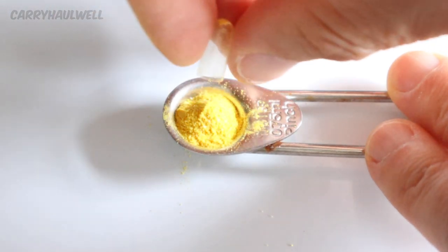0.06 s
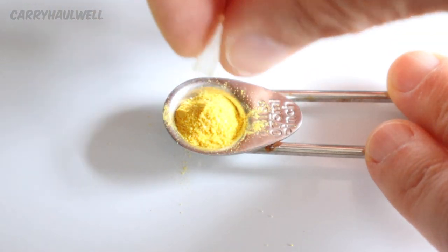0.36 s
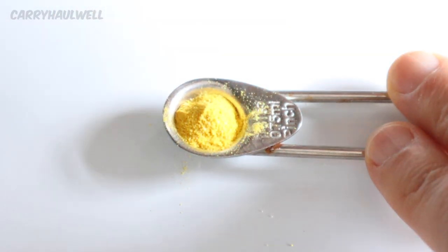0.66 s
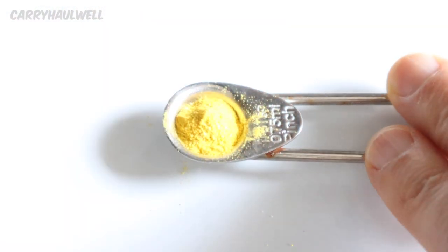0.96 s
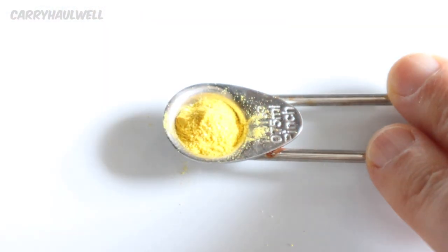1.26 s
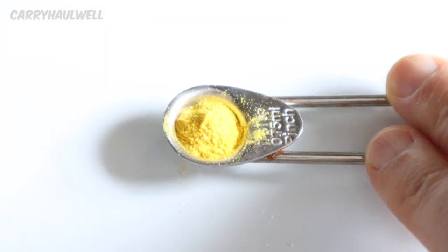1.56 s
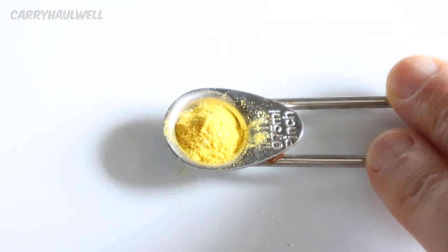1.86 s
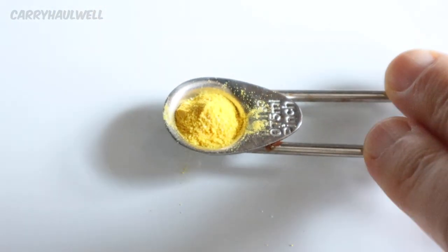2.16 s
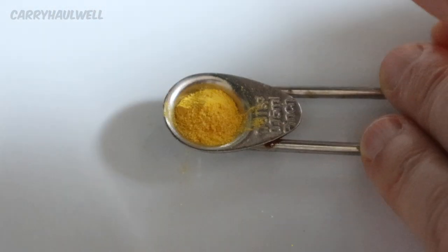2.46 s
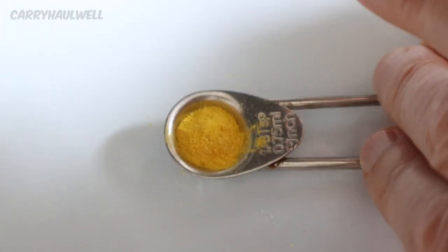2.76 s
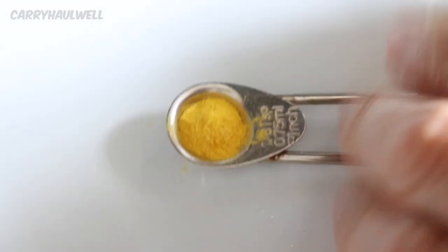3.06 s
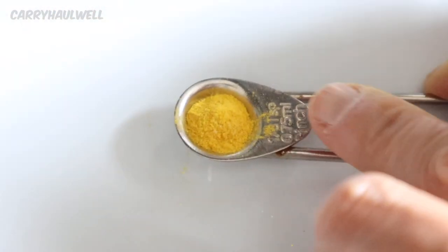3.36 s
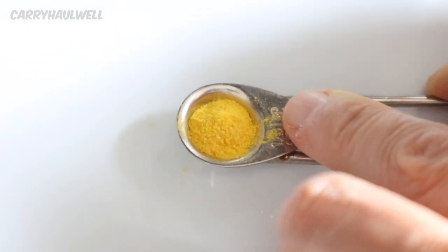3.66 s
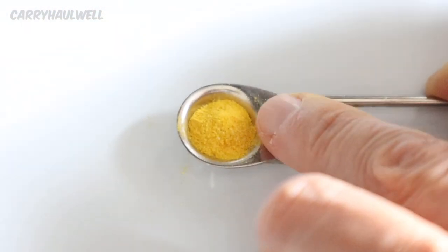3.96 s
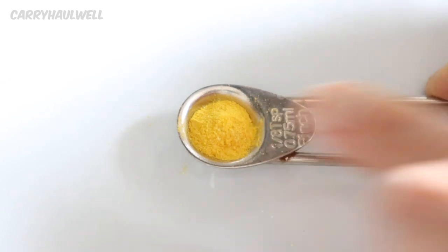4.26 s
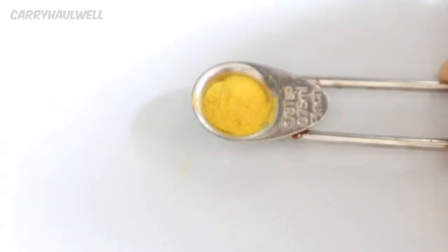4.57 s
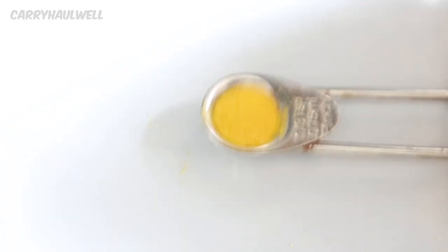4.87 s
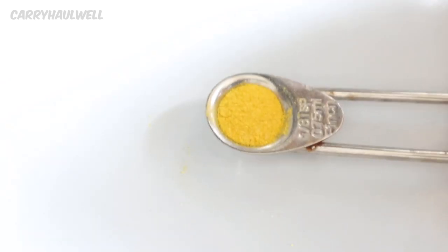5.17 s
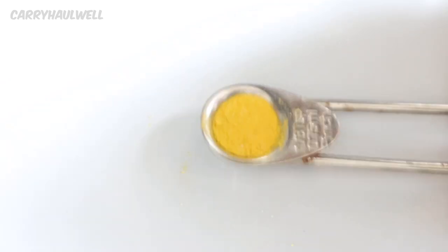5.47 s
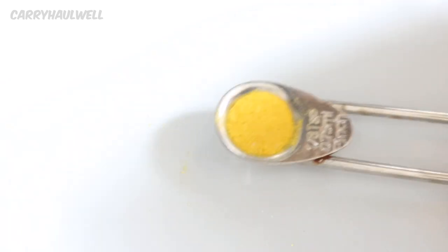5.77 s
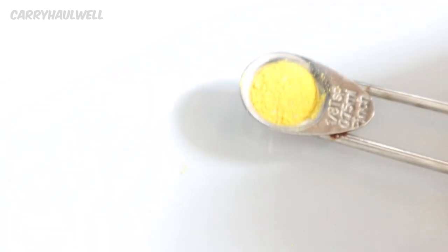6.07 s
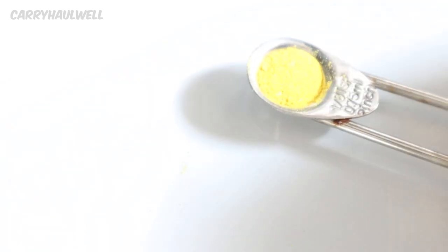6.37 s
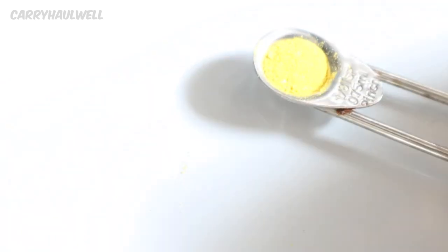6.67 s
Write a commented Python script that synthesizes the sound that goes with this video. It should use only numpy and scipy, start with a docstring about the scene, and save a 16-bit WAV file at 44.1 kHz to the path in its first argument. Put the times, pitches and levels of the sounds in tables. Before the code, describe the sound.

In a quiet room with a low hum, an empty capsule shell clicks and crinkles faintly. A small steel measuring spoon taps on a dish, with dull thuds of pressing fingers and two brief clinks of its wire handle. After a lull, the spoon knocks rapidly and scrapes over the dish in tiny jolts, ending with a few separate taps. Everything is close and slightly to the right.

```python
"""In a quiet room that hums low, a small steel measuring spoon of powder is held on a dish close by.
An emptied capsule shell clicks and crinkles as it is put aside. Fingers press the powder down with
dull thuds, and the wire handle clinks when they let it drop. The spoon knocks on the dish, making
both ring briefly, and scrapes over it in tiny jolts as it sticks and slips."""
import sys
import numpy as np
from scipy import signal
from scipy.fft import rfft, irfft, next_fast_len
from scipy.io import wavfile

SR = 44100
rng = np.random.default_rng(int(sys.argv[2]) if len(sys.argv) > 2 else 0)


def dump(signal):
    """Clip the signal to [-1, 1] and save it as 16-bit WAV at the path in sys.argv[1]."""
    limited = np.clip(np.atleast_2d(signal).T, -1, 1)
    pcm = np.round(limited * 32767).astype(np.int16)
    wavfile.write(sys.argv[1], SR, pcm)


N = 300235
T = np.arange(N) / SR
AGE = T[:int(0.4 * SR)]  # seconds since the start of one hit
ATTACK = int(0.02 * SR)  # a hit's level is set over this many opening samples

# the room's rumble and hiss: f/Hz, level/dB
AIR_SPECTRUM = [(12, -30), (20, -13.5), (53, 7), (111, -3), (132, -9), (178, -0.5), (270, -9.5), (377, -6),
                (457, -14), (571, -14), (865, -18.5), (1420, -23), (6910, -41), (12400, -55), (15000, -79)]
# the tones of its hum: f/Hz, level/dB
HUM_TONES = [(54, -79), (107, -54), (135, -58), (172, -63)]
# capsule clicks: t/s, body level/dB, snap level/dB, fizz level/dB, crumple time/s
CAPSULE_CLICKS = [(0.7046, -60, -63, -98, 0.00059), (0.996, -54, -79, -93, .003),
                  (1.645, -54, -78, -98, 0.0023), (1.654, -36, -48, -79, 0.0051),
                  (1.674, -57, -72, -88, 0.0027), (1.7235, -46, -48, -65, 0.0046),
                  (1.7575, -44, -53, -61.5, 0.0042), (1.829, -47.5, -56.5, -67.5, 0.0056),
                  (2.812, -47, -71, -69, 0.0011), (3.1299, -42, -60, -67, 0.0058)]
# the noise of the cracking shell: f/Hz, level/dB
SHELL_SPECTRUM = [(500, 14), (1200, 4), (3000, 4.5), (4200, 15), (5700, 12), (6400, 13), (7600, -3),
                  (15000, -5)]
# the shell's modes (notes it rings at): f/Hz, level/dB, t60/s (time to fade by 60 dB)
SHELL_NOTES = [(1890, -10, 0.012), (2960, 5.5, 0.019), (5760, 1, 0.018), (6170, -1, 0.013)]
# spoon slides, pressed harder, then eased off: t/s, rise/s, fall/s, rub level/dB, grit level/dB
SPOON_SLIDES = [(0.97, 0.021, 0.85, -61, -68), (2.692, 0.0087, 0.091, -46.5, -51.5),
                (2.75, 0.12, 0.13, -38.5, -51.5), (4.64, 0.075, 0.07, -34.5, -44),
                (4.83, 0.089, 0.15, -31, -41.5), (5.27, 0.038, 0.17, -37, -49.5),
                (5.29, 0.1, 0.039, -42, -45), (5.43, 0.012, 0.47, -33.5, -51),
                (5.46, 0.068, 0.043, -50, -39), (5.65, 0.011, 0.036, -33.5, -38.5),
                (5.7, 0.045, 0.14, -40, -49), (5.999, 0.049, 0.044, -41.5, -59),
                (6.1, 0.026, 0.18, -55.5, -62)]
# clear modes of the dish on the table: f/Hz, level/dB, t60/s
DISH_NOTES = [(135.2, -12, 0.56), (161.6, -9.5, 0.42), (297, -3.5, 0.19), (380, -0.5, 0.087),
              (471, 3, 0.062), (572, -3.5, 0.046), (706.5, -9, 0.23), (903, 6, 0.059), (1216, -2.5, 0.082),
              (1581, 1.5, 0.084), (2044, 3, 0.03), (2750, 0, 0.048), (3190, -7.5, 0.059), (3660, -5, 0.028)]
# its many short-lived modes, blurred into noise: f/Hz, level/dB
CLATTER_SPECTRUM = [(70, 6.5), (170, -3.5), (235, -5.5), (350, 3.5), (520, 5.5), (660, -7.5), (950, -2.5),
                    (1380, -9.5), (1580, -4), (1900, -9.5), (2400, -11.5), (3200, -14), (4400, -30.5),
                    (6500, -59), (12000, -51)]
# the hard tick of steel on the dish: f/Hz, level/dB
TICK_SPECTRUM = [(3000, -10), (4200, -1), (4900, -5.5), (6700, -6), (7900, -11), (8450, -5.5), (9300, -18),
                 (10300, -10), (11000, -15.5), (12200, -18), (13700, -26), (14300, -38)]
# modes of the steel spoon: f/Hz, level/dB, t60/s
SPOON_NOTES = [(3900, -2, .12), (4430, 0, .15), (5260, -4, .14), (5700, -5, .12), (6450, 0, .12),
               (6880, -2, .11), (7530, -4, .13), (8480, 0, .17), (10300, -5, .15), (10600, -6, .15),
               (11580, -5, .1), (12200, -3, .06), (13700, -5, .06)]
# spoon knocks: t/s, level/dB, hardness/(dB per octave), hollow rap/dB, looseness of grip (1 = free),
# body f/Hz and clack f/Hz of the struck spot
SPOON_KNOCKS = [(1.072, -44.5, -6, -9, 0.4, 470, 2330), (1.4901, -37.5, -4, 8.5, 0.58, 900, 2160),
                (1.621, -42, -6, -12, 0.59, 480, 2800), (1.872, -43, -3, 1.5, 1.1, 470, 2460),
                (2.2012, -39.5, -1, 1, 0.65, 454, 2090), (2.254, -40.5, -6, 5, 1.3, 440, 2140),
                (2.2995, -36, -5.5, 4, 0.76, 378, 1500), (2.502, -39.5, -5.5, 2.5, 0.66, 417, 2850),
                (2.766, -42.5, -1.5, -10, 0.66, 570, 2720), (2.7936, -35, -3.5, 5.5, 0.77, 576, 2750),
                (2.814, -41.5, -0.4, 3.5, 0.63, 553, 2810), (2.85, -48, -4, 9, 0.48, 380, 1640),
                (2.881, -31, -1.5, 3, 0.75, 494, 2930), (2.958, -53, -5, 8, 0.26, 490, 3120),
                (3.124, -35.5, -5.5, -2, 0.26, 470, 1790), (3.1317, -27, -1.5, -3.5, 0.55, 457, 1790),
                (3.144, -39, 1.5, 9, 0.48, 490, 1890), (3.186, -41.5, -1.5, 2.5, 1, 455, 2110),
                (3.259, -43.5, -7.5, 8.5, 0.53, 504, 1480), (3.2765, -34.5, -8, 5, 0.46, 480, 1500),
                (3.922, -47, -6.5, -13, 1.3, 362, 1940), (4.394, -39.5, -2.5, 1.5, 0.65, 463, 2720),
                (4.5353, -43.5, 0, 4, 0.34, 820, 2850), (4.551, -45, -1.5, 2, 0.91, 513, 1570),
                (4.6104, -37.5, 3.5, 4, 1.06, 472, 2030), (4.649, -28.5, 0.3, 5, 0.51, 530, 2450),
                (4.659, -34.5, 2.46, -2, 0.25, 530, 2450), (4.68, -43, 1, 4, 0.44, 590, 2700),
                (4.705, -41.5, -1, 6, 1.3, 296, 2660), (4.78, -39, 1, 3, 1.5, 1127, 2010),
                (4.801, -31, 0.1, 1, 0.88, 516, 2970), (4.8184, -28, 2, -22, 0.91, 510, 1570),
                (4.829, -28.5, 1.5, -1, 0.64, 483, 1530), (4.853, -31.5, -1.5, 1, 0.85, 400, 2120),
                (4.885, -41, 0, -10, 0.29, 483, 1490), (4.897, -33, -5, 4, 0.32, 530, 2380),
                (4.906, -38.5, -1, 11.5, 0.54, 550, 2400), (4.93, -41.5, 3, -2, 0.7, 477, 2380),
                (4.952, -34.5, -1.5, -3, 0.72, 452, 1600), (4.9827, -34, 1.2, 4, 0.93, 380, 2750),
                (5.0124, -30, -3, 1, 0.34, 566, 2650), (5.039, -38, -1.5, -2, 0.37, 534, 1530),
                (5.1023, -32, -2, -1.5, 0.57, 436, 2790), (5.146, -36, -5, 1.5, 0.25, 610, 2840),
                (5.198, -41.5, -6.5, -5, 0.17, 590, 2690), (5.243, -44.5, -2.5, -3, 0.81, 380, 1820),
                (5.308, -42, -2, -4, 1.8, 410, 3190), (5.346, -39, -2, 8, 0.14, 390, 3130),
                (5.374, -41.5, 1, 7, 1.2, 470, 2420), (5.412, -42.5, 1, -1, 0.53, 600, 1520),
                (5.4483, -38, 4, 1, 0.97, 495, 3180), (5.463, -35, -6.5, 5, 0.79, 495, 3240),
                (5.501, -38.5, 1, 0, 0.9, 556, 3180), (5.535, -36.5, 0, 4.5, 0.7, 580, 1516),
                (5.549, -36, -3, -10, 0.27, 298, 1590), (5.6002, -35.5, 3.5, 4, 0.76, 900, 3220),
                (5.641, -44.5, 1.5, 3, 0.22, 860, 1540), (5.672, -43.5, 2.1, -7, 0.31, 920, 2020),
                (5.708, -41, -6.5, 3, 0.23, 490, 2150), (5.749, -39.5, 4, 0.5, 0.75, 526, 3270),
                (6.14, -47.5, -6.5, 3, 0.58, 366, 1500), (6.176, -45.5, -2.5, 0, 0.43, 580, 1840),
                (6.3736, -30.5, -0.6, 7.5, 0.45, 830, 1470), (6.448, -44.5, -1.5, 6, 0.35, 590, 1590),
                (6.549, -45, -1.5, -10, 0.61, 464, 2080), (6.727, -49, -4, 9, 0.77, 820, 1950)]
# a knock's five pitch ranges (thump, body, rap, clack, tick): f/Hz, level/dB at hardness 0
KNOCK_RANGES = [(130, -9.5), (420, 3), (900, -1), (2200, -2.5), (7000, -22.5)]
# the hand's weight comes down on the dish: t/s, level/dB
HAND_THUDS = [(2.2, -51), (2.253, -48), (2.414, -40.5), (2.502, -37.5), (3.187, -56), (3.258, -36.5),
              (3.2741, -35.5), (4.5354, -39.5), (4.6056, -37.5), (4.649, -31), (4.848, -31), (5.011, -35),
              (5.146, -37)]
# the wire handle drops: t/s, level/dB, f/Hz, top ring level/dB
HANDLE_CLINKS = [(2.8825, -51, 2840, -64), (3.133, -51, 4414, -65)]
# the handle's thin top ring: f/Hz, level/dB, t60/s
HANDLE_NOTES = [(8400, -3, .07), (11590, -5, .04), (12050, 0, .05), (13750, 1, .06)]
# stereo width of close sounds: f/Hz, side minus mid level/dB
NEAR_WIDTH = [(60, -27), (300, -44), (700, -13.5), (1400, -7.5), (3000, -2.5), (6000, 5.5), (13000, 10.5)]
# stereo width of sound from all around: f/Hz, side minus mid level/dB
DIFFUSE_WIDTH = [(60, -27), (110, -21.5), (200, -10), (380, -10), (700, -3), (1300, 1), (2400, 3.5),
                 (8000, 5), (15000, 3)]
# balance of close sounds: f/Hz, left minus right level/dB
BALANCE = [(110, 0.5), (700, -1), (1300, -3.5), (2400, -5), (4400, -3), (15000, -2)]
# how long the room echoes: f/Hz, t60/s
ROOM_DECAY = [(100, 0.45), (500, 0.37), (1200, 0.51), (2500, 0.51), (6000, 0.47), (14000, 0.18)]
# share of the spoon and dish that the room gives back: f/Hz, level/dB
ROOM_SHARE = [(400, -6.5), (1200, -14.5), (3200, -15), (7000, -22)]


def undb(db):
    """Turn decibels into a number to multiply by."""
    return 10 ** (np.asarray(db) / 20)


def rms(x):
    """Average strength of a signal (root mean square)."""
    return np.sqrt(np.mean(x ** 2) + 1e-20)


def unit(x):
    """Scale a signal so that its energy is 1."""
    return x / np.sqrt(np.sum(x ** 2))


def fade(t60):
    """A curve, one hit long, that falls by 60 dB every t60 seconds."""
    return np.exp(-np.log(1000) * AGE / max(t60, 1e-4))


def lookup(points, hz):
    """Read between (f, value) points, with the octaves evenly spaced."""
    f, value = np.transpose(points)
    return np.interp(np.log(np.maximum(hz, 1)), np.log(f), value)


def colour(x, points, turn=1):
    """Turn each pitch up or down by (f, level) points; turn=-1j delays it a quarter cycle."""
    size = next_fast_len(x.shape[-1])
    gains = undb(lookup(points, np.fft.rfftfreq(size, 1 / SR)))
    return irfft(rfft(x, size) * turn * gains, size)[..., :x.shape[-1]]


def band(x, lo_hz, hi_hz, order=3):
    """Keep the pitches between two limits."""
    return signal.sosfilt(signal.butter(order, [lo_hz, hi_hz], "band", fs=SR, output="sos"), x)


def through(x, response):
    """Let every push in x set off the response, an object's sound after one tap."""
    return signal.oaconvolve(x, response)[:len(x)]


def add(track, s, sound):
    """Mix a sound into a track at s seconds."""
    start = int(s * SR)
    track[start:start + len(sound)] += sound[:N - start]


def at_level(hit, db):
    """Scale a hit so that its opening has this level."""
    return hit * undb(db) / rms(hit[:ATTACK])


def band_levels(hit, edges_hz, levels_db, order=3):
    """Give each pitch range of a hit its own level, as a soft or hard touch does."""
    parts = (band(hit, lo, hi, order) for lo, hi in zip(edges_hz, edges_hz[1:]))
    return sum(at_level(part, db) for part, db in zip(parts, levels_db))


def noise(spectrum):
    """Coloured noise, one hit long."""
    return colour(rng.standard_normal(len(AGE)), spectrum)


def mode(hz, t60):
    """One pure note that dies away."""
    return unit(fade(t60) * np.sin(2 * np.pi * hz * AGE))


def ring(modes, scatter_db, detune, looseness=1):
    """Several fading notes, a little different at each touch; a loose grip lets them last."""
    gains = undb(scatter_db * rng.uniform(-1, 1, len(modes))) * rng.choice([-1, 1], len(modes))
    shifts = 1 + detune * rng.uniform(-1, 1, len(modes))
    return unit(sum(gain * undb(db) * fade(t60 * looseness) * np.sin(2 * np.pi * hz * shift * AGE)
                    for gain, shift, (hz, db, t60) in zip(gains, shifts, modes)))


def contact(chatter_s, chatter_db=-7, bounces_per_s=1500):
    """One push, then tiny bounces that quickly die out."""
    bounces = rng.standard_normal(len(AGE)) * (rng.random(len(AGE)) < bounces_per_s / SR)
    return (AGE == 0) + undb(chatter_db) * bounces * np.exp(-AGE / max(chatter_s, 1e-4))


def jolts(per_s, size, spread_db=5):
    """Little pushes of uneven strength at random moments."""
    strengths = undb(spread_db * np.clip(rng.standard_normal(size), -2, 2)) * rng.choice([-1, 1], size)
    pushes = (rng.random(size) < per_s / SR) * strengths
    return pushes / rms(pushes)


def room_hum(air_db=-46, waver_hz=5, waver_db=2.5):
    """A steady rumble and hiss lie under low tones that waver in level and pitch."""
    mid, side = colour(rng.standard_normal((2, N)), AIR_SPECTRUM)
    out = diffuse(mid, side) * undb(air_db) / rms(mid)
    times = np.arange(0, T[-1] + 1, 1 / waver_hz)
    for hz, db in HUM_TONES:
        swell, drift = (np.interp(T, times, rng.standard_normal(len(times))) for _ in range(2))
        out += np.sqrt(2) * undb(db + waver_db * swell) * np.sin(2 * np.pi * hz * T + 2 * drift)
    return out


def capsule_clicks(crack_t60=0.019, notes_db=-5, crinkle_db=-5.5, crinkle_t60=0.27, full_crumple_s=0.004):
    """The thin shell snaps, then gives way in tiny dry steps; a longer crumple crinkles louder."""
    out = np.zeros(N)
    for s, body_db, snap_db, fizz_db, crumple_s in CAPSULE_CLICKS:
        crack = unit(noise(SHELL_SPECTRUM) * fade(crack_t60))
        crease = unit(noise(SHELL_SPECTRUM) * fade(crack_t60 / 2))
        notes = ring(SHELL_NOTES, scatter_db=3, detune=0.03)  # squeezing shifts them
        force = unit(contact(crumple_s, chatter_db=-2.5, bounces_per_s=2000))
        snap = through(force, crack + undb(notes_db) * notes)
        steps = unit(jolts(per_s=800, size=len(AGE)) * fade(crinkle_t60))
        crinkle = undb(crinkle_db) * crumple_s / full_crumple_s * through(steps, crease)
        click = band_levels(snap + crinkle, [300, 2200, 7500, 15000], [body_db, snap_db, fizz_db], 4)
        add(out, s, click)
    return out


def dish(looseness, clatter_t60=0.15, notes_db=-3):
    """One touch on the dish sets off a few clear notes within a short clatter."""
    clatter = unit(noise(CLATTER_SPECTRUM) * fade(clatter_t60 * looseness))
    notes = ring(DISH_NOTES, scatter_db=4, detune=0.04, looseness=min(looseness, 1.2))
    return clatter + undb(notes_db) * notes


def steel(looseness, hardness, tick_t60=0.052, ring_db=-13.5):
    """The spoon gives a short tick, duller for a soft touch, and rings faintly."""
    treble_db = 1.5 * (hardness - 3)
    hiss = colour(noise(TICK_SPECTRUM), [(6500, 0), (13000, treble_db)])
    tick = unit(hiss * fade(tick_t60 * looseness))
    return tick + undb(ring_db) * ring(SPOON_NOTES, scatter_db=6, detune=0.025)


def spoon_scrapes(slips_per_s=220, grains_per_s=800, looseness=0.42, steel_db=-21, spots=3):
    """The spoon sticks and slips, rubbing the dish; finer grains add grit and a steely rasp."""
    out, age = np.zeros(N), T[:int(1.2 * SR)]
    for s, rise_s, fall_s, rub_db, grit_db in SPOON_SLIDES:
        pressure = np.interp(age, [0, rise_s, rise_s + fall_s], [0, 1, 0])
        place = (spots - 1) * age / (rise_s + fall_s)
        rasp = undb(steel_db) * unit(band(steel(looseness, hardness=0), 3800, 6500))
        for spot in range(spots):  # each spot along the slide rings differently
            push = pressure * np.sqrt(np.maximum(1 - abs(place - spot), 0))
            response = dish(looseness)
            rub = unit(band(response, 140, 1000))
            grit = unit(band(response, 1000, 4400)) + rasp
            for per_s, db, body in (slips_per_s, rub_db, rub), (grains_per_s, grit_db, grit):
                add(out, s, undb(db) * through(push * jolts(per_s, len(age)), body))
    return out


def struck_spot(body_hz, clack_hz, looseness, body_db=-5, clack_db=-10.5):
    """The spot that is hit favours two notes: a low body and a brief, higher clack."""
    body = undb(body_db) * mode(body_hz, t60=0.048 * looseness)
    return body + undb(clack_db) * mode(clack_hz, t60=0.022)


def spoon_knocks(chatter_s=0.0031, rise_s=0.0006):
    """The spoon hits the dish: harder is brighter, and a loose spoon chatters and rings longer."""
    out, rise = np.zeros(N), 1 - np.exp(-AGE / rise_s)
    centres_hz, plain_db = np.transpose(KNOCK_RANGES)
    octaves_above_body = np.maximum(np.log2(centres_hz / 420), 0)
    for s, db, hardness, hollow_db, looseness, body_hz, clack_hz in SPOON_KNOCKS:
        thump_db, body_db, rap_db, clack_db, tick_db = db + plain_db + hardness * octaves_above_body
        force = contact(chatter_s * looseness ** 2)
        response = dish(looseness) + struck_spot(body_hz, clack_hz, looseness)
        blow = through(force, response * rise)
        tick = through(force, steel(looseness, hardness) * rise)
        levels_db = [thump_db, body_db, rap_db + hollow_db, clack_db]
        add(out, s, band_levels(blow, [85, 290, 710, 1150, 4200], levels_db) + at_level(tick, tick_db))
    return out


def hand_thuds(push_s=0.0084, table_db=-9):
    """A soft hand stirs only the lowest notes of the dish and the table under it."""
    out = np.zeros(N)
    for s, db in HAND_THUDS:
        response = dish(looseness=0.85) + undb(table_db) * mode(hz=145, t60=0.054)
        thud = band(through(contact(push_s), response), 95, 210)
        add(out, s, at_level(thud, db))
    return out


def handle_clinks():
    """The dropped wire handle rings briefly: one clear note with thin, high ones above it."""
    out = np.zeros(N)
    for s, db, hz, top_db in HANDLE_CLINKS:
        top = ring(HANDLE_NOTES, scatter_db=2, detune=0.004)
        add(out, s, at_level(mode(hz, t60=0.065), db) + at_level(top, top_db))
    return out


def near(x):
    """A close sound a little to the right: the left channel is later and mostly weaker."""
    side = colour(x, NEAR_WIDTH, turn=-1j)
    return np.array([colour(x + sign * side, [(hz, sign * db / 2) for hz, db in BALANCE])
                     for sign in (1, -1)])


def diffuse(mid, side):
    """Sound from all around, wider at high pitches: both ears share mid, and side sets them apart."""
    side = colour(side, DIFFUSE_WIDTH)
    return np.array([mid + side, mid - side])


def table_echoes(x, t60=0.0077, build_s=0.00086, change_s=0.13, patterns=4):
    """Table and hands throw back a quick spray of echoes that changes as the hands move."""
    shape = fade(t60) * (1 - np.exp(-AGE / build_s))
    place, mid_side = T / change_s, np.zeros((2, N))
    for k in range(patterns):  # each echo pattern blends into the next, round and round
        share = np.sqrt(np.maximum(1 - abs((place - k + 1) % patterns - 1), 0))
        sprays = rng.standard_normal((2, len(AGE))) * shape
        mid_side += [through(x * share, unit(spray)) for spray in sprays]
    return diffuse(*mid_side)


def room_echoes(x, build_s=0.00082):
    """The echoes of a small room build up fast and die soonest in the high treble."""
    edges_hz = np.geomspace(60, 16000, 9)
    hiss = rng.standard_normal((2, len(AGE)))
    tails = sum(band(hiss, lo, hi) * fade(lookup(ROOM_DECAY, np.sqrt(lo * hi)))
                for lo, hi in zip(edges_hz, edges_hz[1:]))
    build = 1 - np.exp(-(AGE / build_s) ** 2)
    return diffuse(*(through(x, unit(tail * build)) for tail in tails))


def scene():
    """Spoon and dish are close and send little treble into the room; the capsule aside sends more."""
    spoon = spoon_knocks() + handle_clinks() + hand_thuds() + spoon_scrapes()
    shell = capsule_clicks()
    to_table = colour(spoon + shell, [(500, -20), (3500, -4.5)])
    to_room = colour(spoon, ROOM_SHARE) + colour(shell, [(6500, -9), (8000, -15)])
    return near(spoon + shell) + table_echoes(to_table) + room_echoes(to_room) + room_hum()


def record(dry):
    """Cut away the very highest treble, above 14800 Hz."""
    return signal.sosfilt(signal.ellip(8, 0.2, 70, 14800, fs=SR, output="sos"), dry)


dry = scene()
out = record(dry)
dump(out)
```